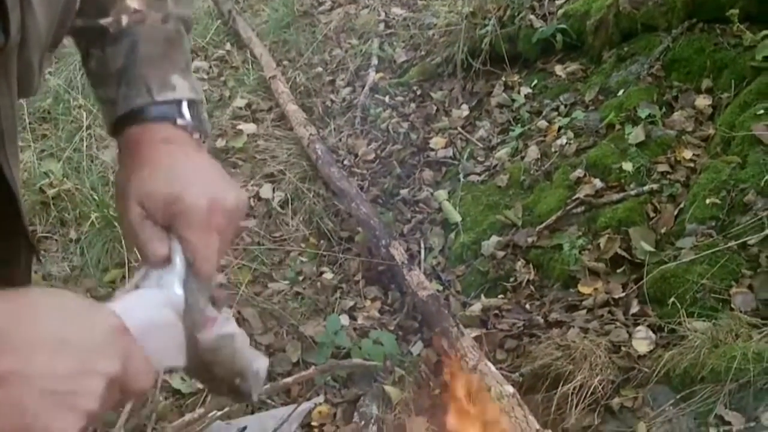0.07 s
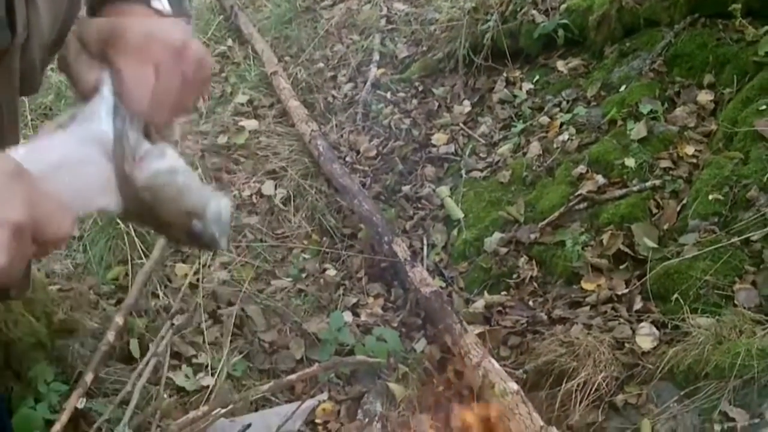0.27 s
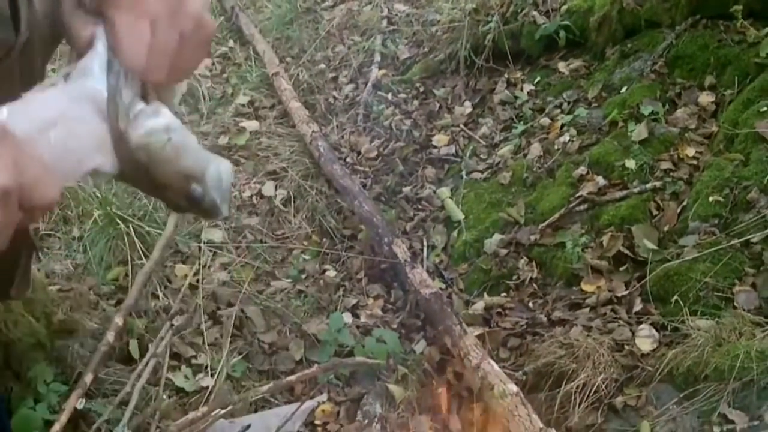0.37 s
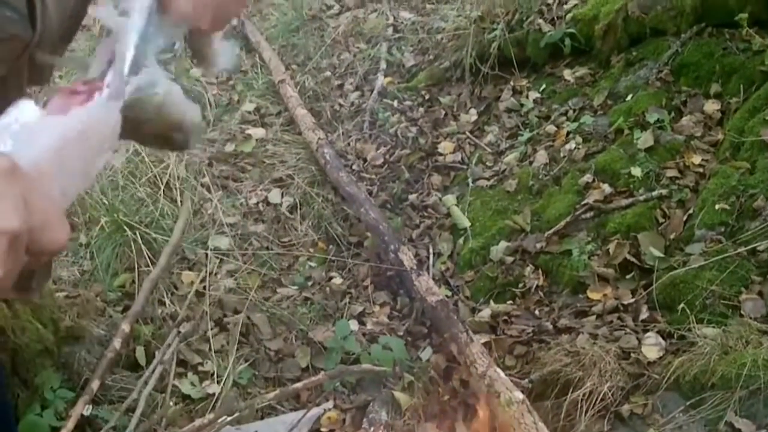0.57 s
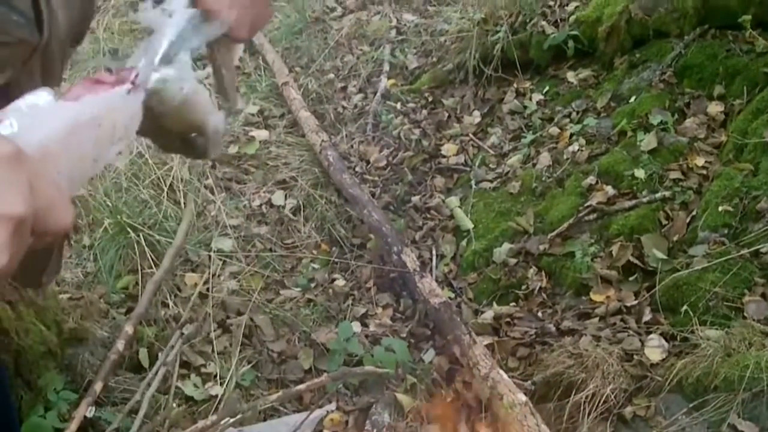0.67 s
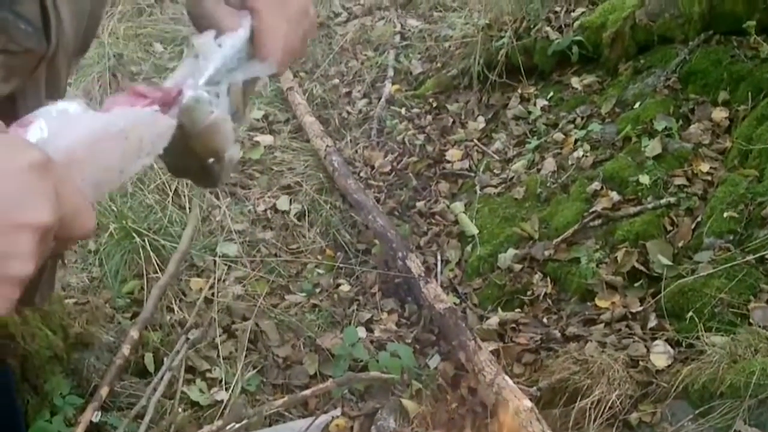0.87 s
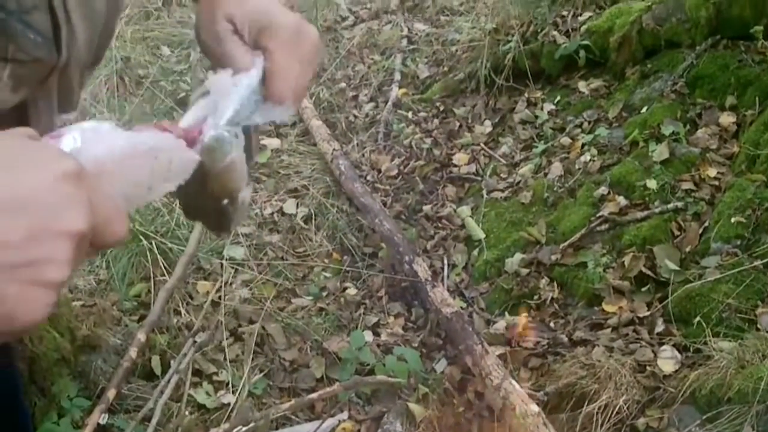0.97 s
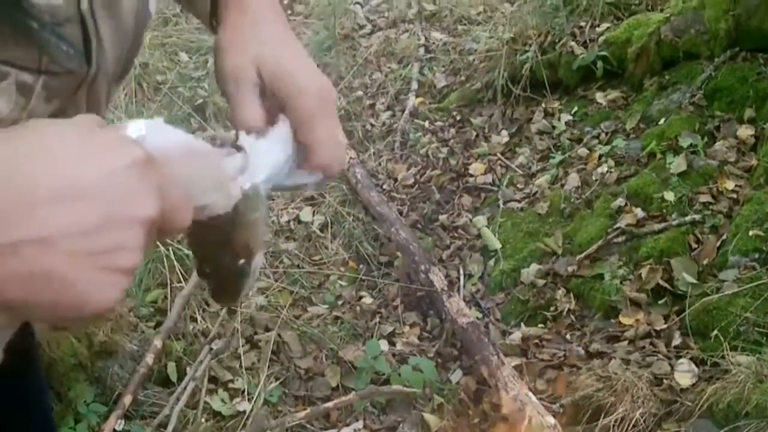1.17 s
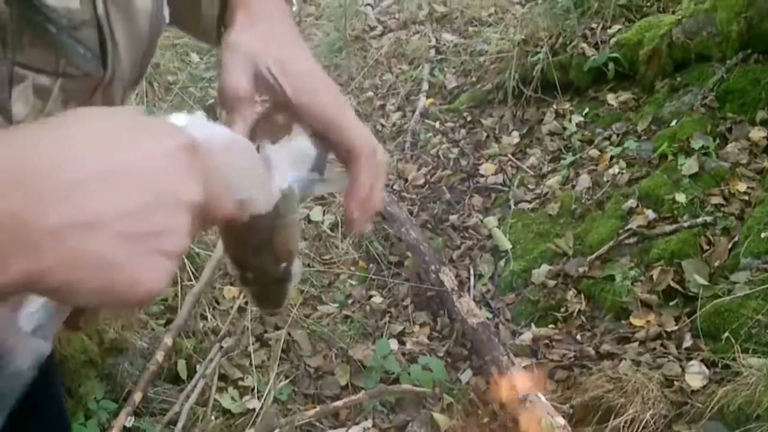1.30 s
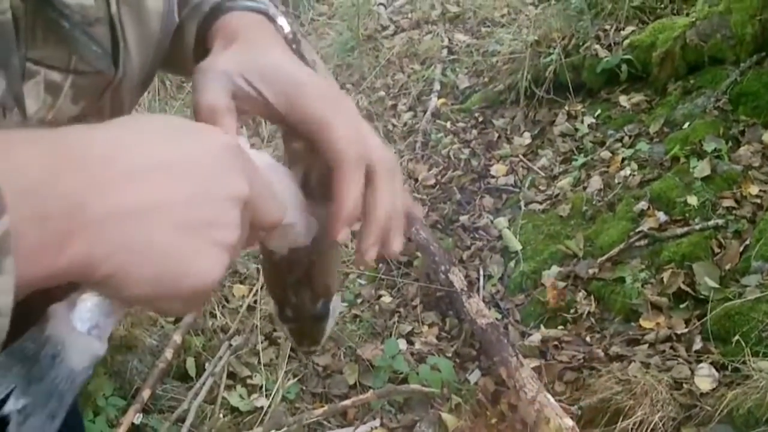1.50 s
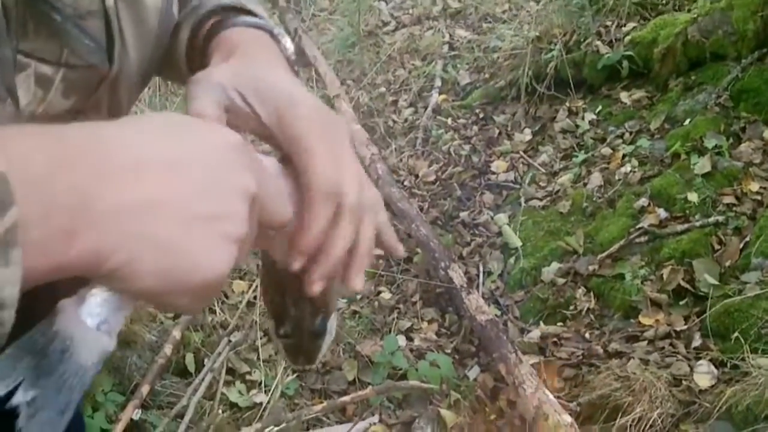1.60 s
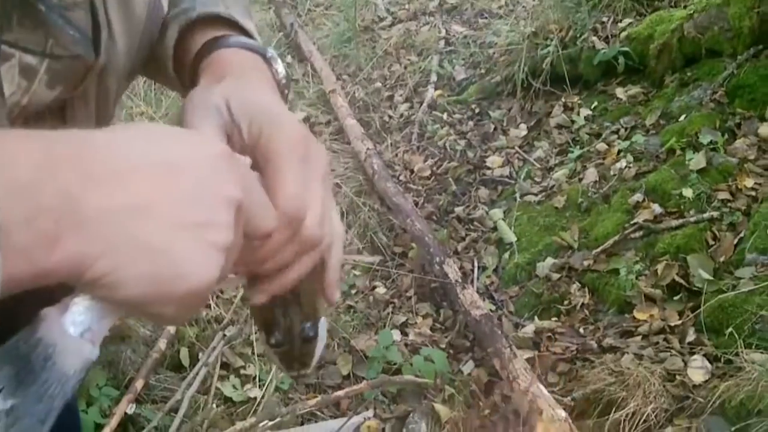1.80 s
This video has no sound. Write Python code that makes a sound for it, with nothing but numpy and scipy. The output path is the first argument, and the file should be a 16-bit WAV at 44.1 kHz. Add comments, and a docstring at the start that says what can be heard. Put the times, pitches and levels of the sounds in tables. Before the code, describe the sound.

Close, dry, bright crackling of fish skin being peeled: scattered snaps build to a dense loud rip, then thin out to isolated clicks and dull hand bumps, with a soft low fire fluttering behind, outdoors, nearly mono.

```python
"""A campfire rumbles and hisses from the start while wet fish skin is peeled off by hand close to a small camera.
Fibres snap as sharp clicks with tiny after-breaks, and air pockets pop as short rough tones.
The tear crackles as clumped puffs of noise, with a few dull bumps of the hands and one faint squeak.
The microphone port gives a ring near 7 kHz, and both channels are almost the same."""
import sys
import numpy as np
from scipy import signal
from scipy.fft import rfft, irfft, next_fast_len
from scipy.io import wavfile
from scipy.ndimage import map_coordinates

SR = 44100
rng = np.random.default_rng(int(sys.argv[2]) if len(sys.argv) > 2 else 0)


def pcm_store(signal):
    """Save signal as 16-bit PCM."""
    levels = np.round(np.clip(np.atleast_2d(signal), -1, 1) * 32767)
    wavfile.write(sys.argv[1], SR, levels.astype(np.int16).T)


def voltage_ratio(level):
    """Linear amplitude factor for a level in decibels (scalar or array-like)."""
    return 10 ** (np.asarray(level, float) / 20)


N = 81585


def unit(x):
    """Scale a signal to an rms (average strength) of 1."""
    return x / np.sqrt(np.mean(x ** 2) + 1e-20)


def colour(points, size):
    """Filter response through (Hz, dB) points that never sounds ahead of its input (minimum phase)."""
    point_hz, point_db = np.transpose(points)
    hz = np.fft.rfftfreq(size, 1 / SR)
    gain_db = np.interp(np.log(hz + 1), np.log(point_hz + 1), point_db)
    cepstrum = irfft(np.log(voltage_ratio(np.maximum(gain_db, -80))), size)
    # Folding the cepstrum onto its first half makes the response causal
    cepstrum[1:size // 2] *= 2
    cepstrum[size // 2 + 1:] = 0
    return np.exp(rfft(cepstrum))


def coloured(x, points):
    """Give a signal the tone colour of the points, at rms 1."""
    size = 2 * next_fast_len(N // 2 + 4096)
    filtered = irfft(rfft(x, size) * colour(points, size), size)
    return unit(filtered[:N])


def wobble(rate):
    """A smooth random curve with the given number of random knots a second."""
    knots = rng.standard_normal(int(N * rate / SR) + 4)
    return map_coordinates(knots, [np.arange(N) * rate / SR])


def add(track, start_s, peak_db, sound):
    """Mix a sound into the track at a start time, with the given peak level."""
    part = track[round(start_s * SR):][:len(sound)]
    scaled = voltage_ratio(peak_db) * sound / np.abs(sound).max()
    part += scaled[:len(part)]


def port_noise():
    """Steady noise of the microphone port, made by filtering random noise."""
    # Tone colour of the noise: pitch_hz [Hz], relative level_db [dB]
    noise_colour = [(20, 0), (150, 1), (500, 4), (2000, -1), (8000, -3), (16000, 2.5)]
    return voltage_ratio(-60) * coloured(rng.standard_normal(N), noise_colour)


def fire():
    """Flames: low filtered noise that flutters, over a nearly steady hiss of higher filtered noise."""
    # Tone colour of the rumble: pitch_hz [Hz], relative level_db [dB]
    rumble_colour = [(12, -33.5), (22, -2.5), (40, -1), (65, -2.5), (100, -8.5), (160, -12.5), (300, -19),
                     (480, -30), (700, -34.5), (1000, -72)]
    # Tone colour of the hiss: pitch_hz [Hz], relative level_db [dB per Hz]
    hiss_colour = [(290, -40), (500, 1), (1300, -5), (2810, -8), (4200, -14), (6200, -5), (7700, -0.5),
                   (9000, -2), (16000, -11.5)]
    rumble_db, hiss_db, hiss_flutter_db = -43.5, -51.5, 0.7

    rumble_noise = coloured(rng.standard_normal(N), rumble_colour)
    rumble = unit(rumble_noise * voltage_ratio(0.3 * wobble(22.6)))
    hiss_level = voltage_ratio(hiss_db + hiss_flutter_db * wobble(30.74))
    hiss = hiss_level * coloured(rng.standard_normal(N), hiss_colour)
    return voltage_ratio(rumble_db) * rumble + hiss


def bumps():
    """Dull bumps of the hands: low tones that swell and die within about two cycles."""
    # Bumps: start_s [s], peak_db [dB], pitch_hz [Hz]
    hand_bumps = [(.234, -38, 200), (1.0435, -30, 200), (1.413, -30, 52), (1.828, -41, 250)]
    out, t = np.zeros(N), np.arange(SR // 10) / SR
    for start_s, peak_db, pitch_hz in hand_bumps:
        swell = t * pitch_hz * np.exp(-1.5 * t * pitch_hz)
        add(out, start_s, peak_db, swell * np.sin(2 * np.pi * pitch_hz * t))
    return out


def squeak():
    """One thin short tone that swells and fades while its phase wavers."""
    # The squeak: start_s [s], length_s [s], peak level_db [dB], pitch_hz [Hz]
    thin_tone = (.575, .075, -54, 1090)
    start_s, length_s, level_db, pitch_hz = thin_tone
    progress = np.clip((np.arange(N) / SR - start_s) / length_s, 0, 1)
    swell = np.sqrt(np.sin(np.pi * progress).clip(0))
    phase = 2 * np.pi * pitch_hz * progress * length_s + 0.6 * wobble(59.4)
    return voltage_ratio(level_db) * swell * np.sin(phase)


def pops(size=2048):
    """Air pockets under the skin: short rough tones with a soft start and a splash of noise."""
    # Pops: start_s [s], peak_db [dB], pitch_hz [Hz], time to fall by 60 dB fade_s [s]
    air_pockets = [(0.0621, -27, 1400, 0.0024), (0.108, -35, 1530, 0.0043), (0.1232, -28.5, 1600, 0.0044),
                   (0.146, -25.5, 1520, 0.0037), (0.152, -32.5, 1580, 0.0053), (0.2261, -17.5, 954, 0.01),
                   (0.2345, -20, 970, 0.0089), (0.4711, -25, 1630, 0.0072), (0.475, -24, 2150, 0.0094),
                   (0.5185, -22, 2050, 0.0067), (0.5275, -22, 2430, 0.01), (0.5585, -19.5, 1900, 0.0054),
                   (0.6578, -25, 2030, 0.0093), (0.6783, -30.5, 2140, 0.0054),
                   (0.7509, -30.5, 3110, 0.0034), (0.7736, -29, 3200, 0.014), (0.8183, -22.5, 2040, 0.0069),
                   (0.8224, -26.5, 1890, 0.021), (0.8623, -34, 1630, 0.011), (1.1365, -36.5, 3040, 0.0054),
                   (1.2789, -30.5, 1460, 0.002), (1.7861, -36.5, 3300, 0.0027), (1.8292, -28, 1480, 0.003),
                   (1.8323, -37, 2470, 0.0026)]
    roughness = 0.1  # random phase step per sample, radians
    # Splash relative to the rest of the pop: level at 1 kHz, and less for small, high-pitched pockets
    splash_db, splash_db_per_octave, splash_top_hz = 4, -17, 5000

    out, t = np.zeros(N), np.arange(size) / SR
    draws = rng.standard_normal((len(air_pockets), 2, size))
    splash_filter = signal.butter(2, [800, splash_top_hz], "band", fs=SR)
    for (start_s, peak_db, pitch_hz, fade_s), (steps, spray) in zip(air_pockets, draws):
        fade = voltage_ratio(-60 * t / max(fade_s, 0.002))
        soft_start = 1 - np.exp(-t / 0.00045)
        tone = np.sin(2 * np.pi * pitch_hz * t + roughness * np.cumsum(steps))
        splash_level = voltage_ratio(splash_db + splash_db_per_octave * np.log2(pitch_hz / 1000))
        splash = splash_level * unit(signal.lfilter(*splash_filter, spray))
        add(out, start_s, peak_db, fade * soft_start * (tone + splash))
    return out


def tear():
    """The tearing skin: clumps of tiny noise puffs shared by a dry treble and a wet middle."""
    # Course of the tear: time_s [s], treble crackle level_db [dB], wet middle level_db [dB]
    tear_course = [(0, -42, -55.5), (0.07, -52, -60.5), (0.1, -43, -48), (0.16, -46, -52.5),
                   (0.211, -51, -70), (0.239, -41.5, -48), (0.29, -40, -62), (0.33, -42.5, -56.5),
                   (0.39, -36.5, -48), (0.446, -35, -50), (0.461, -23.5, -35), (0.49, -30, -34.5),
                   (0.528, -25, -36), (0.56, -30, -36.5), (0.572, -38.5, -48), (0.601, -39.5, -50),
                   (0.615, -53, -68), (0.64, -47, -56), (0.66, -39, -52), (0.71, -43, -58),
                   (0.73, -53.5, -66), (0.755, -44, -54.5), (0.802, -36, -53), (0.818, -27, -47),
                   (0.834, -38.5, -54), (0.87, -42, -52), (0.89, -55, -67), (0.915, -58, -62),
                   (0.923, -33, -49), (0.949, -40.5, -58.1), (0.965, -53, -64), (1.05, -45, -60.5),
                   (1.12, -51.5, -59.5), (1.18, -44.5, -64.5), (1.29, -48, -66), (1.315, -43.5, -70),
                   (1.34, -51, -69), (1.5, -53, -74), (1.6, -52.5, -69), (1.85, -45.5, -65)]
    # Tone colour of the dry crackle: pitch_hz [Hz], relative level_db [dB per Hz]
    crackle_colour = [(1760, -50), (3000, -12), (4700, -8.5), (6100, 0.5), (7600, 0.5), (9000, -11.5),
                      (11000, -17), (16000, -31)]
    # Tone colour of the wet middle: pitch_hz [Hz], relative level_db [dB]
    squelch_colour = [(150, -12), (320, -8), (600, -20), (900, -13), (1400, -2), (2100, 0), (2900, -10),
                      (4000, -24)]
    puffs_per_s, puff_spread_db, puff_decay_s = 900, 4, 0.0005
    # Smooth share beside the puffs: dB at the hardest pull, and dB gained per dB of softer pull
    smooth_db, smoother_when_soft = -9, 0.55

    time_s, treble_db, middle_db = np.transpose(tear_course)
    t = np.arange(N) / SR
    crackle_db = np.interp(t, time_s, treble_db)
    squelch_db = np.interp(t, time_s, middle_db)

    puff_size = voltage_ratio(puff_spread_db * rng.standard_normal(N).clip(-2, 2))
    starts = (rng.random(N) < puffs_per_s / SR) * puff_size
    decaying = signal.lfilter([1], [1, -np.exp(-1 / (puff_decay_s * SR))], starts)
    # Quick and slow random swells gather the puffs into clumps
    puffs = unit(decaying * voltage_ratio(2.4 * wobble(150) + 0.95 * wobble(40)))

    smooth = voltage_ratio(smooth_db + smoother_when_soft * (treble_db.max() - crackle_db))
    loudness = (puffs + smooth) / np.sqrt(1 + smooth ** 2)
    dry_noise, wet_noise = loudness * rng.standard_normal((2, N))
    crackle = voltage_ratio(crackle_db) * coloured(dry_noise, crackle_colour)
    squelch = voltage_ratio(squelch_db) * coloured(wet_noise, squelch_colour)
    return crackle + squelch


def snaps(size=2048):
    """Fibres snapping: a sharp break and a dying shower of smaller ones, with a ring and a broad edge."""
    # Snaps: start_s [s], peak_db [dB], ring_hz [Hz], time for the shower to fall by 60 dB fade_s [s]
    fibre_snaps = [(0.0623, -25, 6440, 0.005), (0.0957, -23, 7140, 0.0059), (0.1043, -20.8, 7150, 0.0039),
                   (0.1225, -20.5, 6000, 0.0056), (0.132, -28, 6100, 0.003), (0.1443, -23.5, 7240, 0.0039),
                   (0.1985, -21, 9000, 0.01), (0.2268, -11.5, 6380, 0.027), (0.2356, -11, 7800, 0.013),
                   (0.239, -18, 7200, 0.011), (0.252, -20, 5500, 0.0033), (0.27, -13.5, 8000, 0.018),
                   (0.2704, -13.5, 6380, 0.017), (0.3559, -21.5, 5400, 0.0085), (0.372, -9.5, 7000, 0.014),
                   (0.3991, -22, 6675, 0.0047), (0.4196, -19, 7400, 0.028), (0.422, -10, 7100, 0.005),
                   (0.4563, -22, 6800, 0.006), (0.463, -12, 6800, 0.04), (0.4747, -11.5, 7300, 0.0069),
                   (0.484, -12, 6700, 0.0071), (0.501, -1, 8100, 0.0037), (0.501, -3.5, 7200, 0.0054),
                   (0.5034, -15, 7300, 0.043), (0.5125, -8, 6350, 0.0036), (0.518, 3.5, 6040, 0.0069),
                   (0.5259, -6, 6630, 0.0054), (0.5289, -8, 6600, 0.011), (0.5362, -9.5, 7100, 0.022),
                   (0.5423, -16, 7040, 0.0082), (0.5483, -17, 7140, 0.003), (0.559, -24, 6960, 0.0016),
                   (0.5587, -6.5, 6900, 0.0022), (0.591, -25, 6700, 0.015), (0.658, -17, 7060, 0.0032),
                   (0.674, -24, 9500, 0.004), (0.6899, -9.5, 7800, 0.008), (0.692, -29, 5800, 0.0056),
                   (0.7505, -15.5, 6570, 0.0017), (0.755, -23, 7100, 0.0065), (0.7738, -19.5, 5370, 0.0056),
                   (0.7935, -27.5, 9500, 0.004), (0.813, -18, 6700, 0.028), (0.8156, -13.5, 6800, 0.0034),
                   (0.8175, -17, 6830, 0.005), (0.823, -18.5, 6800, 0.038), (0.901, -32, 6800, 0.012),
                   (0.922, -14, 7100, 0.0042), (0.927, -29, 6900, 0.0054), (1.0135, -13, 7000, 0.0027),
                   (1.039, -14.5, 6830, 0.02), (1.0428, -17.5, 6500, 0.014), (1.0409, -15, 9970, 0.015),
                   (1.1364, -12, 7260, 0.012), (1.1376, -26, 9100, 0.0068), (1.2799, -25, 7240, 0.017),
                   (1.3004, -26, 6500, 0.0091), (1.307, -25.5, 6250, 0.0015), (1.3107, -21.5, 6600, 0.0035),
                   (1.311, -22, 5560, 0.0035), (1.47, -28, 6650, 0.0074), (1.4932, -28, 7760, 0.015),
                   (1.767, -39, 8000, 0.003), (1.7861, -12, 6960, 0.0094), (1.8298, -15.5, 7070, 0.0081)]
    # Tone colour of the broad edge: pitch_hz [Hz], relative level_db [dB]
    edge_colour = [(240, -51.5), (400, -20), (921, -18.5), (5110, -14.5), (6740, -2), (10900, -13.5),
                   (12300, -10.5), (16000, -22)]
    ring_width_hz, edge_db = 1760, -4
    after_db, after_spread_db = -11, 1.5  # level and random spread of the smaller breaks

    out, t = np.zeros(N), np.arange(size) / SR
    hz = np.fft.rfftfreq(size, 1 / SR)
    edge = voltage_ratio(edge_db) * colour(edge_colour, size)
    draws = rng.standard_normal((len(fibre_snaps), 2, size))
    for (start_s, peak_db, ring_hz, fade_s), (kicks, size_draw) in zip(fibre_snaps, draws):
        fade_db = -60 * t / max(fade_s, 0.001)
        breaks = kicks * voltage_ratio(after_db + after_spread_db * (size_draw - 1) + fade_db)
        breaks *= t < 0.03
        breaks[0] = 1  # the first sharp break
        damping = 1j * hz * ring_width_hz
        resonance = damping / (ring_hz * ring_hz - hz * hz + damping)
        # Squaring passes the breaks through the resonance twice
        add(out, start_s, peak_db, irfft(rfft(breaks) * (resonance ** 2 + edge), size))
    return out


def scene():
    """A centred scene: the channels differ by a little skin treble and the port noise."""
    skin = snaps() + pops() + tear() + squeak()
    middle = skin + bumps() + fire()
    # Taking differences twice favours the treble
    skin_treble = np.diff(skin, 2, prepend=[0, 0])
    side = voltage_ratio(-29) * skin_treble + port_noise()
    return np.array([middle + side, middle - side])


def roll_off(x):
    """The treble ends steeply here."""
    return signal.sosfilt(signal.butter(12, 16500, fs=SR, output="sos"), x)


def record(dry):
    """Clip at full scale, then remove everything from 16.4 kHz up."""
    clipped = np.clip(dry, -1, 1)
    below_top = np.fft.rfftfreq(N, 1 / SR) < 16400
    mix = irfft(rfft(clipped) * below_top, N)
    return roll_off(mix)


dry = scene()
out = record(dry)
pcm_store(out)
```